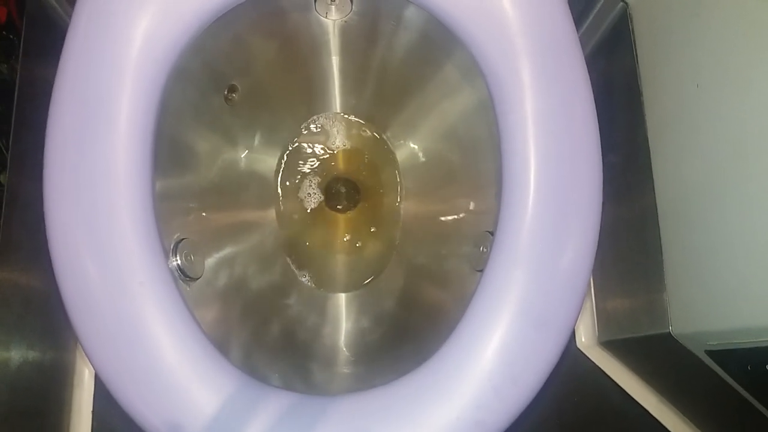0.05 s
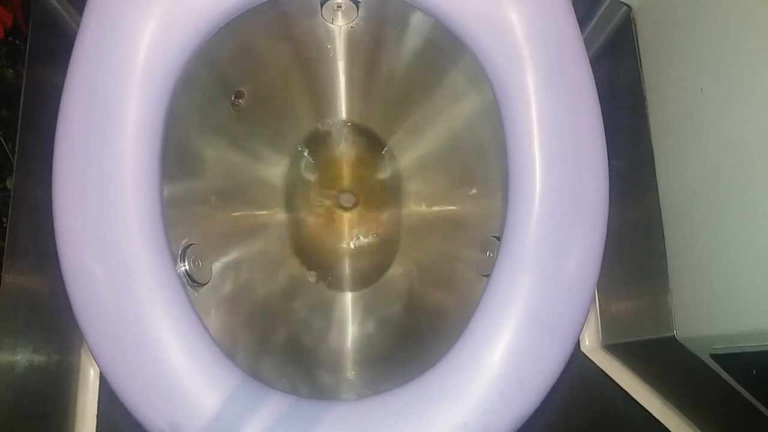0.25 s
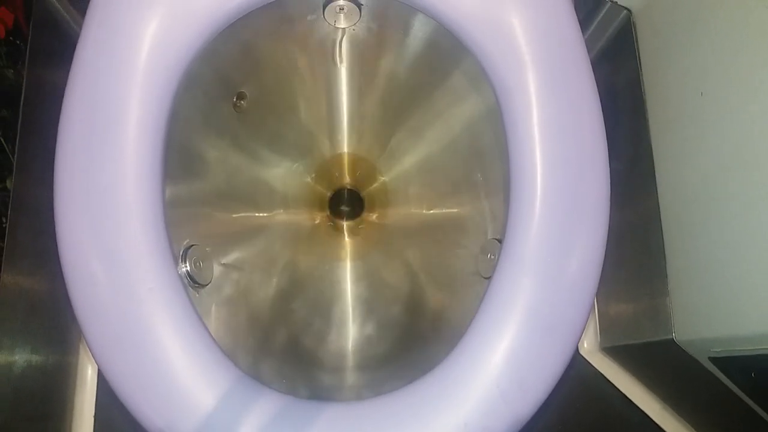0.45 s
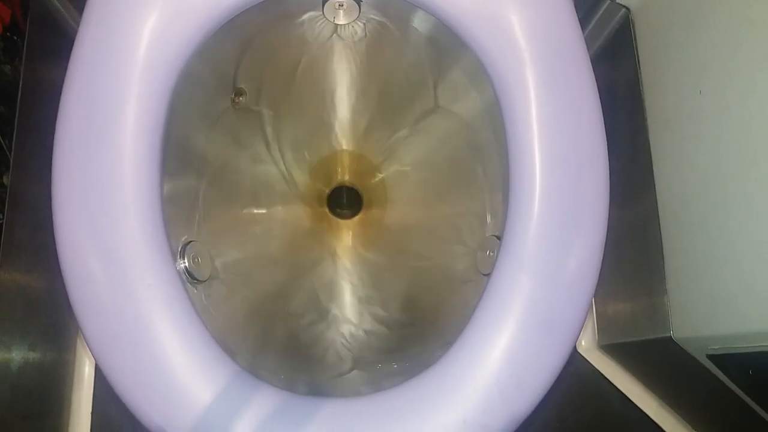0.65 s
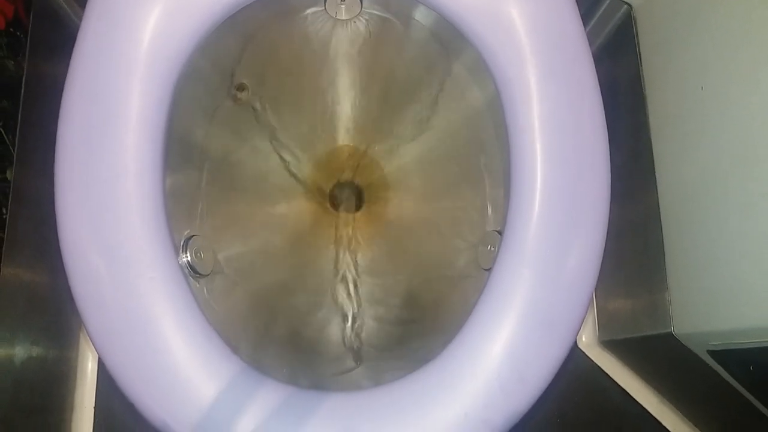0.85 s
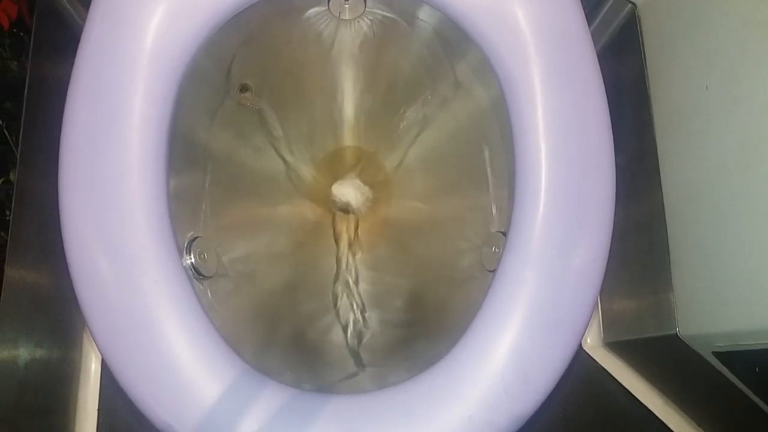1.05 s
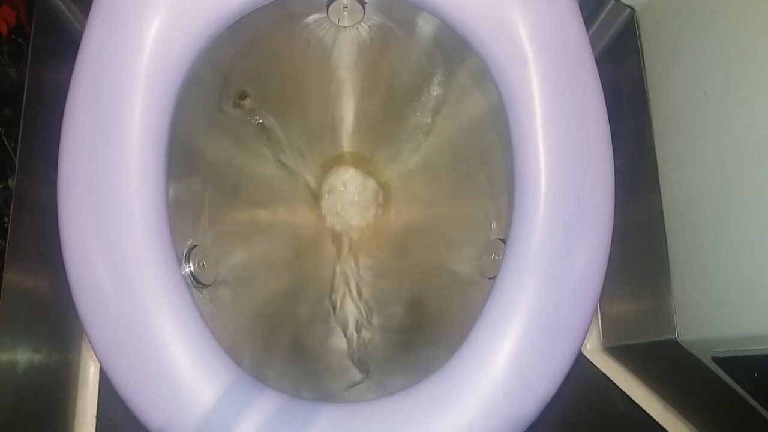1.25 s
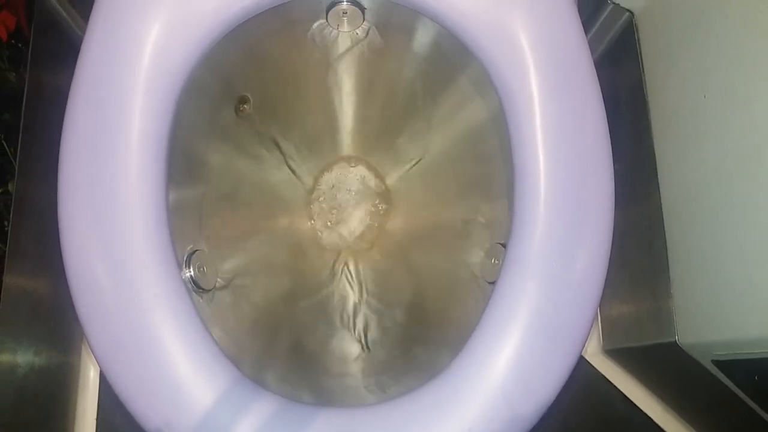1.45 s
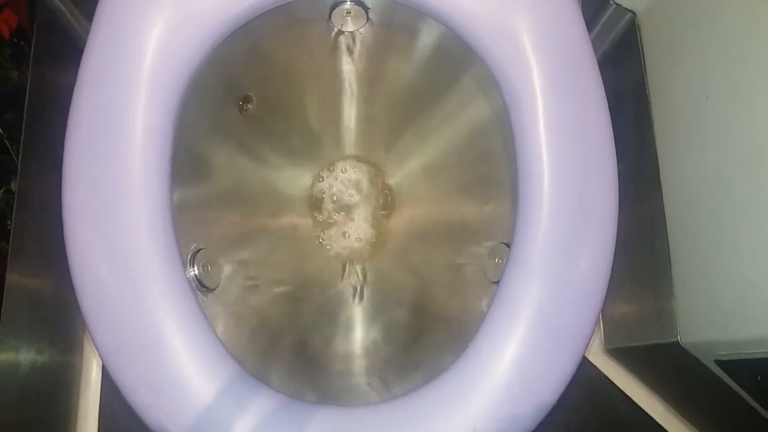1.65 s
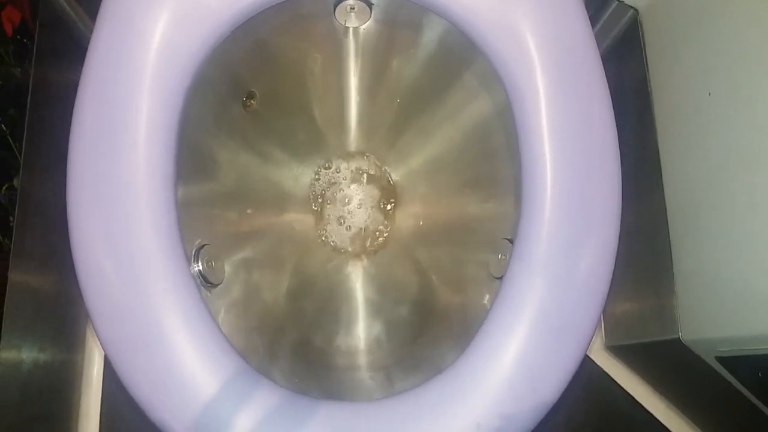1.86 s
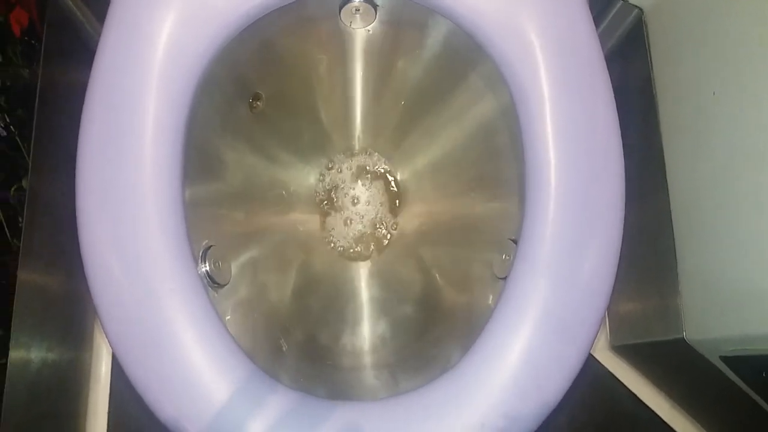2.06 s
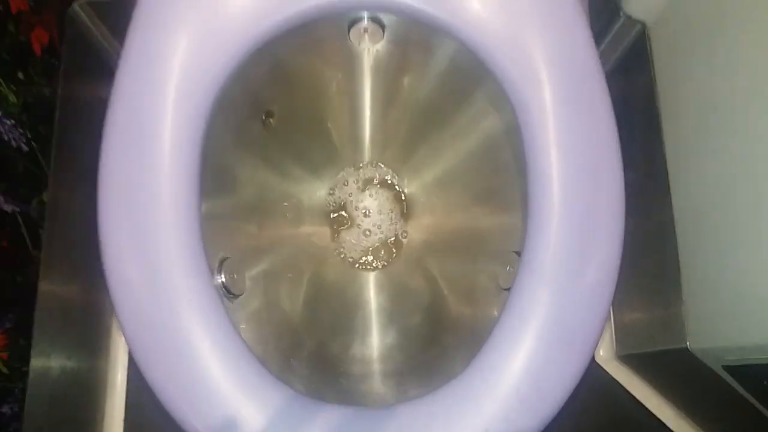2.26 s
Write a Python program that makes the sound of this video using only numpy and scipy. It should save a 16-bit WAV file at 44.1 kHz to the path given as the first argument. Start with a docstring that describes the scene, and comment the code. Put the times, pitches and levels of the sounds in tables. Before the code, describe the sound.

Vacuum toilet flush in a rumbling train cabin: sharp air whoosh, loud gulp, watery plops, click

```python
"""Vacuum toilet in a train cabin

A close microphone in a small cabin hears a vacuum toilet flush. Air valves puff bands of bright hiss and the
drain gulps, as gritty noise rings its pipe. Rinse water trickles as grainy noise and plops as gliding tones in
the steel bowl, while a leak whistles downward; a valve snaps shut last, leaving faint air.
The carriage rumbles throughout as shaped noise, with a hum of two sines that comes and goes."""
import sys
import numpy as np
from scipy import signal
from scipy.fft import rfft, irfft
from scipy.io import wavfile
from scipy.ndimage import uniform_filter1d

SR = 44100
rng = np.random.default_rng(int(sys.argv[2]) if len(sys.argv) > 2 else 0)


def dump(signal):
    """Clip the signal to [-1, 1] and save it as 16-bit WAV at the path in sys.argv[1]."""
    limited = np.clip(np.atleast_2d(signal).T, -1, 1)
    pcm = np.round(limited * 32767).astype(np.int16)
    wavfile.write(sys.argv[1], SR, pcm)


N = 101429  # samples, 2.3 s

# Carriage rumble spectrum. Each row: frequency in Hz, density in dB per Hz.
RUMBLE_COLOUR = [(18, -60), (30, -31.5), (65, -8.5), (113, -4), (146, -8.5), (198, -1.5), (238, -14.5),
                 (300, -27.5), (390, -55), (660, -120)]
# Swell of the rumble around RUMBLE_DB. Each row: time in seconds, level in dB.
RUMBLE_SWELL = [(0, -2), (.2, -2), (.6, -2.5), (1.0, -1), (1.45, -7), (1.7, 0.8), (2.0, 1.5), (2.3, 1.5)]
RUMBLE_DB, RUMBLE_FLICKER_DB = -32.5, 1.5
# Carriage hum. Each row: time in seconds, level in dB.
HUM_LEVEL = [(0, -50), (.78, -55), (.85, -34), (.93, -41), (1.0, -47), (1.45, -58), (1.56, -33),
             (1.64, -38), (1.7, -29.5), (1.77, -42.5), (1.82, -31), (1.92, -36), (1.98, -55), (2.05, -36.5),
             (2.15, -36.5), (2.22, -40), (2.3, -33)]
HUM_HZ, HUM_OCTAVE_DB, HUM_FLICKER_DB = 198.7, -18.5, 1.5
# Ventilation resonances. Each row: frequency in Hz, width in Hz, level in dB.
VENT_MODES = [(372, 15, -3), (556, 13, 5), (783, 12, -10), (3355, 89, -34), (6000, 49, -34)]
# Broad colour of the ventilation. Each row: frequency in Hz, density in dB per Hz.
VENT_BROAD = [(350, -31.5), (600, 7.5), (687, -21), (761, 0.5), (872, -17), (999, -7.5), (1740, -8.5),
              (9000, -53), (11700, -69), (19800, -120)]
# Ventilation, soon faded away. Each row: time in seconds, level in dB.
VENT_LEVEL = [(0, -52.5), (.2, -52.5), (.3, -83.5)]
VENT_RING_DB = 3.5  # resonances against the broad colour
# Steadier drone of the walls. Each row: frequency in Hz, density in dB per Hz.
DRONE_COLOUR = [(200, -17), (250, 0.4), (330, -5), (450, -9.5), (540, -12), (680, -19), (800, -17),
                (1200, -27), (1800, -53)]
# Resonances in the drone. Each row: frequency in Hz, width in Hz, level in dB.
DRONE_LINES = [(484.3, 14, -1), (547.6, 8.4, .1)]
# Drone of the walls. Each row: time in seconds, level in dB.
DRONE_LEVEL = [(0, -46), (1.3, -47.5), (1.5, -51.5), (1.7, -48), (2.3, -44)]
DRONE_LINES_DB = -9.5

# Air puffs. Each row: start in seconds, level in dB before band-passing, attack in seconds, hold in seconds,
# sag in dB over the hold, release t60 in seconds, low edge in Hz, high edge in Hz.
PUFFS = [(0.209, -45, 0.0042, 0.015, -3, 0.051, 2480, 7560),
         (0.23, -22.5, 0.0075, 0.12, -15, 0.17, 302, 18100),
         (0.232, -24, 0.0051, 0.017, -6, 0.1, 9000, 15060),
         (0.361, -27.5, 0.0043, .07, -24, .18, 1000, 14000), (0.52, -33, .001, .02, -7.5, 0.29, 3480, 7300),
         (0.541, -32, 0.005, 0.023, -8, 0.18, 2010, 15000),
         (0.587, -27.5, 0.0083, 0.025, -15.5, 0.16, 1000, 12100),
         (0.553, -34, .002, .012, -5, .1, 2000, 8000), (0.635, -45, .006, .02, -6, 0.1, 1500, 9000),
         (0.97, -24.5, .014, 0.11, -8.5, 0.13, 2160, 11200),
         (1.279, -34, 0.0098, 0.024, -6, 0.16, 3000, 14000)]
# Colour of the valve air. Each row: frequency in Hz, density in dB per Hz.
AIR_COLOUR = [(180, -46), (300, -4), (418, 2.5), (584, -15), (1030, -6), (1360, -10.5), (2520, -10),
              (6620, -13.5), (11700, -15.5), (16000, -26.5)]
AIR_FLICKER_DB = 1.5
# Leak whistle. Each row: time in seconds, pitch in Hz, level in dB.
WHISTLE = [(.4, 15780, -100), (.47, 15460, -66), (.55, 14200, -64), (.62, 12900, -78), (.72, 11800, -68),
           (.8, 11100, -71), (.9, 10400, -71), (1.1, 9500, -69), (1.28, 8700, -72), (1.4, 8300, -100)]
WHISTLE_FLUTTER_PER_S = 250  # random levels per second

# Suction through the drain. Each row: time in seconds, throat level in dB, deep pipe level in dB.
SUCTION = [(0.26, -33, -30), (0.274, -38, -35), (0.304, -36, -36.5), (0.312, -24, -25), (0.36, -34.5, -27),
           (0.37, -10, -18.5), (0.392, -11.5, -16.5), (0.442, -17, -28.5), (0.486, -39.5, -30),
           (0.51, -28.5, -55), (0.52, -24.5, -45), (0.546, -35, -41.5), (0.556, -30.5, -47),
           (0.582, -38, -52), (0.598, -33, -57), (0.686, -52, -56), (0.72, -60, -32)]
# Pipe resonances. Each row: frequency in Hz, width in Hz, level in dB.
DRAIN_MODES = [(463, 23, -5.5), (832, 35, -1.8), (918, 40, -3), (958, 40, 2.2), (1383, 18, 0),
               (1533, 57, 0.5), (1669, 50, -2), (1750, 30, -2), (2455, 51, -7), (2884, 60, -15),
               (4570, 40, -14.5)]
# Broad colour of the drain. Each row: frequency in Hz, density in dB per Hz.
DRAIN_BROAD = [(150, -16.5), (300, -2.5), (470, -7), (560, -6.5), (720, -11), (930, -2.5), (1150, -4.5),
               (1600, -0.4), (1800, -2), (2050, -9.5), (2500, -6.5), (3500, -19.5), (6000, -26),
               (10000, -62)]
DRAIN_RING_DB, DRAIN_GRAINS_PER_S, DRAIN_GRIT_DB = -1.9, 900, 2.5
DEEP_HZ = 700  # split between deep pipe and throat
# Valve thumps through the bowl. Each row: start in seconds, level in dB, starting pitch in Hz, t60 in seconds.
THUMPS = [(.232, -19.5, 140.5, 0.27), (.285, -18.5, 255, 0.14), (.366, -11.5, 159.2, 0.27),
          (0.976, -11, 163.5, 0.17)]
# The bowl and floor shake under the suction.
SHAKE_S, SHAKE_DB, SHAKE_HOLD_S, SHAKE_T60_S, SHAKE_LOW_HZ, SHAKE_HIGH_HZ = 0.21, -28, .25, 0.23, 49.9, 170
# Tone of the bowl.
BOWL_S, BOWL_HZ, BOWL_DB = .375, 630.6, -22.5
BOWL_ATTACK_S, BOWL_HOLD_S, BOWL_SAG_DB, BOWL_T60_S = .02, 0.095, -7.5, 0.1

# Rinse water running. Each row: time in seconds, level in dB.
RINSE_LEVEL = [(.62, -46), (.7, -48.5), (.9, -47.5), (.97, -35.5), (1.0, -26.5), (1.05, -44), (1.09, -36.5),
               (1.14, -44.5), (1.27, -54), (1.31, -41.5), (1.5, -49.5), (1.56, -51), (1.68, -61),
               (1.75, -72)]
# Colour of the rinse water. Each row: frequency in Hz, density in dB per Hz.
RINSE_COLOUR = [(290, -54), (500, -17), (668, -20), (794, -17), (1080, -9.5), (1600, -5), (2140, -15.5),
                (5000, -23.5), (6500, -57), (11000, -120)]
# Drain mouth rung by the rinse. Each row: frequency in Hz, width in Hz, level in dB.
RINSE_MODES = [(1510, 74, -6), (1640, 64, .1), (1747, 80, -1.5)]
RINSE_RING_DB, RINSE_GRAINS_PER_S, RINSE_GRIT_DB = -3, 700, 2.2
# Spray from the rinse jets. Each row: frequency in Hz, density in dB per Hz.
SPRAY_COLOUR = [(1290, -33), (2200, 0), (3280, -1.5), (5220, -9.5), (7970, -10.5), (10300, -17),
                (11600, -18), (16000, -30)]
# Rinse spray. Each row: time in seconds, level in dB.
SPRAY_LEVEL = [(.45, -64), (.6, -51), (.75, -53), (.96, -47.5), (1.15, -53), (1.27, -53.5), (1.4, -58.5),
               (1.54, -62), (1.57, -75), (1.7, -75.5)]
# Water plops. Each row: start in seconds, level in dB, starting pitch in Hz, t60 in seconds.
PLOPS = [(0.311, -14.5, 1347, 0.027), (0.37, -3, 963, 0.03), (0.518, -14.5, 1520, 0.03),
         (0.523, -19, 1580, 0.024), (0.75, -31, 922, 0.065), (0.818, -17, 1460, 0.018),
         (0.864, -30, 2540, 0.03), (0.891, -44, 1370, 0.03), (0.928, -17, 1360, 0.019),
         (0.974, -12.5, 1343, 0.024), (1.046, -20, 1540, 0.023), (1.081, -18, 916, 0.025),
         (1.161, -25, 1600, 0.022)]
# Lower plops. Each row: start in seconds, level in dB, starting pitch in Hz, t60 in seconds.
LOW_PLOPS = [(0.819, -20, 535, 0.042), (0.827, -26, 627, 0.05), (0.894, -27.5, 371, 0.048),
             (1.085, -20.5, 460, 0.042)]
PLOP_GLIDE, PLOP_ATTACK_S = 0.074, .0007
# Broad splashes in the bowl. Each row: start in seconds, level in dB, hold in seconds,
# release t60 in seconds, low edge in Hz, high edge in Hz.
SPLASHES = [(0.739, -39.5, 0.028, 0.11, 397, 1510), (0.82, -36, 0.016, 0.17, 395, 820),
            (.889, -30.5, 0.0014, 0.026, 300, 1840), (0.977, -27.5, .03, 0.17, 241, 1080),
            (1.077, -32, .045, 0.082, 246, 1230), (1.282, -39.5, .015, .1, 297, 1200)]
# The last water squeaks up the drain mouth.
SQUEAK_S, SQUEAK_DB, SQUEAK_HZ, SQUEAK_T60_S, SQUEAK_ATTACK_S, SQUEAK_GLIDE = 1.615, -45.5, 1770, .2, 0.014, 0.083

# Broad colour of the closing snap. Each row: frequency in Hz, density in dB per Hz.
SNAP_BROAD = [(180, -36), (300, -12.5), (678, -21), (856, -8.5), (1190, -8.5), (1580, -6.5), (1750, -7),
              (2400, -13), (2650, -20.5), (3400, -16), (4590, -33), (5080, -26.5), (6620, -37.5),
              (8500, -17), (12900, -40), (15000, -27), (16000, -36)]
# Resonances of the snap. Each row: frequency in Hz, width in Hz, level in dB.
SNAP_MODES = [(390, 60, 8), (950, 150, -17), (1620, 120, 0.5), (2470, 150, -7), (3750, 200, -12)]
SNAP_S, SNAP_DB, SNAP_HOLD_S, SNAP_T60_S, SNAP_RING_DB = 2.029, -27, .015, 0.13, -8.5
SNAP_TICK_DB, SNAP_TICK_T60_S = -1, 0.051  # tick level is relative to the snap
HOUSING_HZ, HOUSING_WIDTH_HZ, HOUSING_DB = 5154, 20, 15  # the valve housing rings on
AFTER_S, AFTER_DB, AFTER_LOW_HZ, AFTER_HIGH_HZ = 2.1, -59.5, 910, 3240  # air flowing after the snap

ROOM_T60_S, ROOM_TREBLE_T60_S, ROOM_SPLIT_HZ, ROOM_DB = 0.23, 0.14, 3300, -9
# Steady hiss of the microphone. Each row: frequency in Hz, density in dB per Hz.
MIC_HISS_COLOUR = [(710, -31), (1200, 5), (4220, -10.5), (5840, -16.5), (10900, -13.5), (16000, -13)]
MIC_HISS_DB, CEILING, TOP_HZ = -64.5, 1.1, 15800


def undb(db):
    """Decibels to amplitude."""
    return 10 ** (np.asarray(db) / 20)


def unit(x):
    """Scale to rms 1."""
    return x / np.sqrt(np.mean(x ** 2))


def curve(table, axis=1):
    """A table column joined by straight lines in time."""
    rows = np.array(table, float)
    return np.interp(np.arange(N) / SR, rows[:, 0], rows[:, axis])


def colour(x, spectrum):
    """Shape a sound by (Hz, dB) points joined on a log frequency axis; rms 1."""
    hz, db = np.array(spectrum, float).T
    f = np.maximum(np.arange(N // 2 + 1) * SR / N, 1)
    gain = undb(np.interp(np.log(f), np.log(hz), db, left=-90))
    return unit(irfft(rfft(x) * gain, N))


def resonance(x, hz, width_hz):
    """One resonant peak driven by the sound."""
    return signal.lfilter(*signal.iirpeak(hz, hz / width_hz, fs=SR), x)


def ring(x, peaks):
    """Sum of resonances; rms 1."""
    return unit(sum(undb(db) * resonance(x, hz, width) for hz, width, db in peaks))


def resonate(x, hz, width_hz, db):
    """The sound plus one narrow resonance that it drives."""
    return x + undb(db) * resonance(x, hz, width_hz)


def band(x, low_hz, high_hz):
    """Band-pass."""
    edges = [low_hz, min(high_hz, .45 * SR)]
    return signal.sosfilt(signal.butter(2, edges, "band", fs=SR, output="sos"), x)


def walk(rate):
    """Random levels held 1 / rate s and slewed twice; rms 1."""
    k = int(SR / rate)
    steps = np.repeat(rng.standard_normal(N // k + 1), k)
    return unit(uniform_filter1d(uniform_filter1d(steps, k), k)[:N])


def grit(per_s, spread_db):
    """Noise whose level jumps from grain to grain."""
    k = int(SR / per_s)
    levels = undb(spread_db * rng.exponential(size=N // k + 1))
    return rng.standard_normal(N) * np.repeat(levels, k)[:N]


def shape(start, attack, hold, sag_db, t60):
    """Squared attack, sagging hold, exponential release."""
    t = np.arange(N) / SR - start
    sag = sag_db * np.clip((t - attack) / hold, 0, 1)
    release = -60 * np.maximum(t - attack - hold, 0) / t60
    return np.clip(t / attack, 0, 1) ** 2 * undb(sag + release)


def blip(start, db, hz, t60, attack, glide):
    """A decaying tone that glides up, or down if glide is negative."""
    t = np.maximum(np.arange(N) / SR - start, 0)
    envelope = undb(db - 60 * t / t60) * -np.expm1(-t / attack)
    return envelope * np.sin(2 * np.pi * hz * t * (1 + glide * np.minimum(t / t60, 1)))


def carriage():
    """Flickering rumble, a wavering hum with its octave, ventilation air and the drone of the walls."""
    rumble = colour(rng.standard_normal(N) * undb(RUMBLE_FLICKER_DB * walk(9.02)), RUMBLE_COLOUR)
    rumble = rumble * undb(RUMBLE_DB + curve(RUMBLE_SWELL))

    phase = 2 * np.pi * np.cumsum(HUM_HZ * (1 + 0.0061 * walk(20))) / SR
    hum_level = np.sqrt(2) * undb(curve(HUM_LEVEL) + HUM_FLICKER_DB * walk(14))
    hum = hum_level * (np.sin(phase) + undb(HUM_OCTAVE_DB) * np.sin(2 * phase))

    draught = rng.standard_normal(N)
    vent = colour(draught, VENT_BROAD) + undb(VENT_RING_DB) * ring(draught, VENT_MODES)
    walls = rng.standard_normal(N)
    drone = colour(walls, DRONE_COLOUR) + undb(DRONE_LINES_DB) * ring(walls, DRONE_LINES)
    return rumble + hum + undb(curve(VENT_LEVEL)) * vent + undb(curve(DRONE_LEVEL)) * drone


def air():
    """Valve puffs of bright hiss, and the falling whistle of a leak, a sine with fluttering level."""
    hiss = colour(rng.standard_normal(N), AIR_COLOUR) * undb(AIR_FLICKER_DB * walk(120))
    puffs = sum(undb(db) * shape(start, attack, hold, sag, t60) * band(hiss, low, high)
                for start, db, attack, hold, sag, t60, low, high in PUFFS)
    tone = np.sin(2 * np.pi * np.cumsum(curve(WHISTLE)) / SR) * walk(WHISTLE_FLUTTER_PER_S)
    return puffs + np.sqrt(2) * tone * undb(curve(WHISTLE, axis=2))


def drain():
    """Air and water tear through the pipe and ring it; the valves thump and the bowl shakes."""
    t = np.arange(N) / SR
    grains = grit(DRAIN_GRAINS_PER_S, DRAIN_GRIT_DB)
    rush = colour(grains, DRAIN_BROAD) + undb(DRAIN_RING_DB) * ring(grains, DRAIN_MODES)
    # fade the suction in and out at the ends of its table
    gate = np.clip(np.minimum(t - SUCTION[0][0], SUCTION[-1][0] - t) / 0.033, 0, 1)
    throat = unit(band(rush, DEEP_HZ, SR)) * undb(curve(SUCTION)) * gate
    deep = unit(band(band(rush, 200, DEEP_HZ), 200, DEEP_HZ)) * undb(curve(SUCTION, axis=2)) * gate

    bowl_shape = shape(BOWL_S, BOWL_ATTACK_S, BOWL_HOLD_S, BOWL_SAG_DB, BOWL_T60_S)
    bowl = undb(BOWL_DB + 2.2 * walk(60)) * np.sin(2 * np.pi * BOWL_HZ * t) * bowl_shape
    thumps = sum(blip(start, db, hz, t60, 0.004, -0.057) for start, db, hz, t60 in THUMPS)
    shake = unit(band(rng.standard_normal(N), SHAKE_LOW_HZ, SHAKE_HIGH_HZ))
    shake = shake * shape(SHAKE_S, 0.0182, SHAKE_HOLD_S, 0, SHAKE_T60_S)
    return throat + deep + bowl + thumps + undb(SHAKE_DB) * shake


def water():
    """A grainy trickle ringing the drain mouth, fine spray, plops, broad splashes and a last squeak."""
    on = np.arange(N) / SR > RINSE_LEVEL[0][0]
    grains = grit(RINSE_GRAINS_PER_S, RINSE_GRIT_DB)
    trickle = unit(colour(grains, RINSE_COLOUR) + undb(RINSE_RING_DB) * ring(grains, RINSE_MODES))
    trickle = trickle * undb(curve(RINSE_LEVEL)) * on
    spray = colour(rng.standard_normal(N), SPRAY_COLOUR) * undb(1.5 * walk(40)) * undb(curve(SPRAY_LEVEL))
    plops = sum(blip(*row, PLOP_ATTACK_S, PLOP_GLIDE) for row in list(PLOPS) + list(LOW_PLOPS))
    splashes = sum(undb(db) * shape(start, 0.0017, hold, -4, t60) * unit(band(grains, low, high))
                   for start, db, hold, t60, low, high in SPLASHES)
    squeak = blip(SQUEAK_S, SQUEAK_DB, SQUEAK_HZ, SQUEAK_T60_S, SQUEAK_ATTACK_S, SQUEAK_GLIDE)
    return trickle + spray + plops + splashes + squeak


def snap():
    """The closing valve: a snap and short rattle ringing its housing, then faint flowing air."""
    rattle = grit(1500, 2.0)
    body = unit(colour(rattle, SNAP_BROAD) + undb(SNAP_RING_DB) * ring(rattle, SNAP_MODES))
    clap = shape(SNAP_S, 0.00088, SNAP_HOLD_S, -2.1, SNAP_T60_S)
    tick = shape(SNAP_S + 0.0021, 0.00079, 0.0012, 0, SNAP_TICK_T60_S)
    knock = undb(SNAP_DB) * body * (clap + undb(SNAP_TICK_DB) * tick)

    after = band(rng.standard_normal(N), AFTER_LOW_HZ, AFTER_HIGH_HZ)
    after = unit(band(after, AFTER_LOW_HZ, AFTER_HIGH_HZ)) * shape(AFTER_S, 0.06, 1, 0, 1)
    return resonate(knock, HOUSING_HZ, HOUSING_WIDTH_HZ, HOUSING_DB) + undb(AFTER_DB) * after


def reverberate(near):
    """The cabin's reflections: decaying noise in which the treble dies sooner."""
    t = np.arange(SR // 2) / SR
    noise = rng.standard_normal(len(t)) * np.clip(t / 0.0027, 0, 1)
    low = band(noise, 20, ROOM_SPLIT_HZ)
    tail = low * undb(-60 * t / ROOM_T60_S) + (noise - low) * undb(-60 * t / ROOM_TREBLE_T60_S)
    return signal.fftconvolve(near, tail / np.sqrt(np.sum(tail ** 2)))[:N]


def scene():
    """The toilet direct and off the cabin walls, over the carriage without added reverberation."""
    near = air() + drain() + water() + snap()
    return (near + undb(ROOM_DB) * reverberate(near) + carriage())[None]


def record(dry):
    """The microphone chain adds faint hiss, rounds the loudest peaks and cuts the top."""
    hiss = undb(MIC_HISS_DB) * colour(rng.standard_normal(N), MIC_HISS_COLOUR)
    rounded = CEILING * np.tanh((dry + hiss) / CEILING)
    return signal.sosfilt(signal.ellip(10, .2, 70, TOP_HZ, fs=SR, output="sos"), rounded)


dry = scene()
out = record(dry)
dump(out)
```